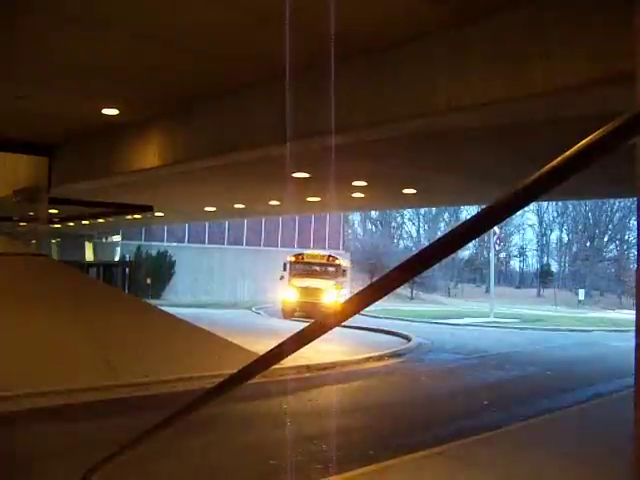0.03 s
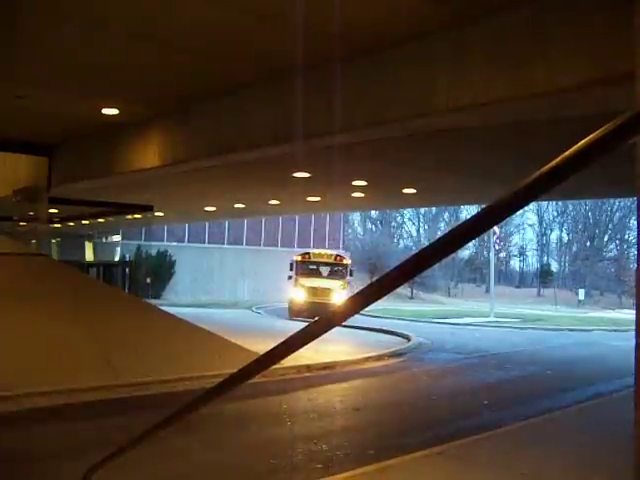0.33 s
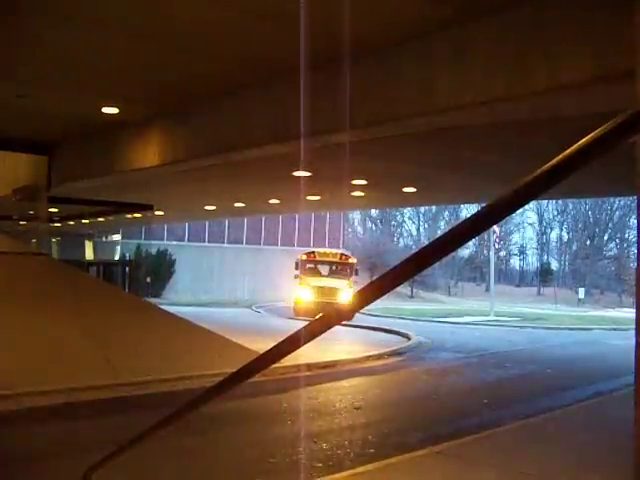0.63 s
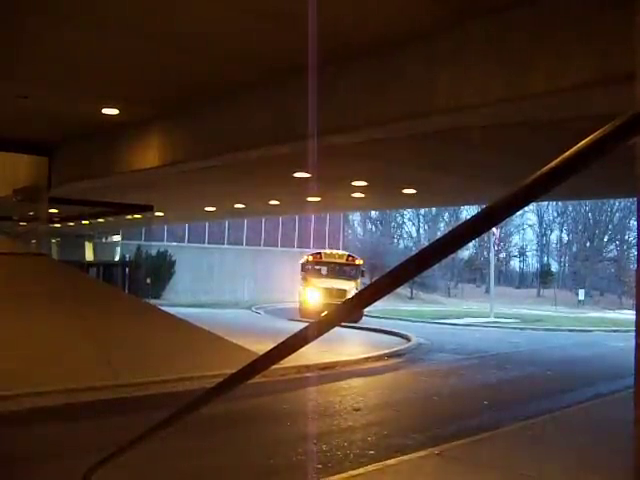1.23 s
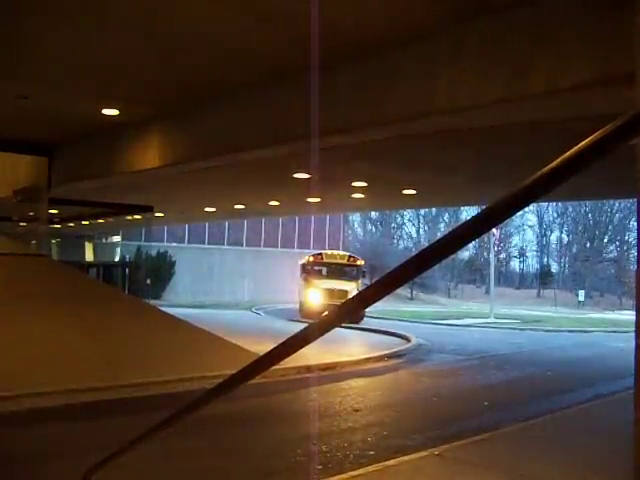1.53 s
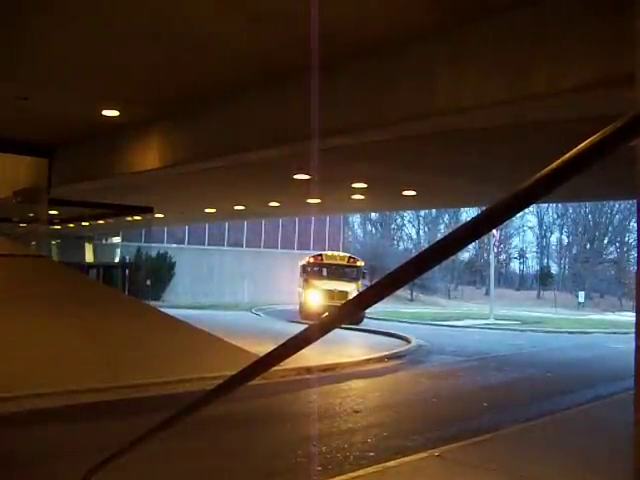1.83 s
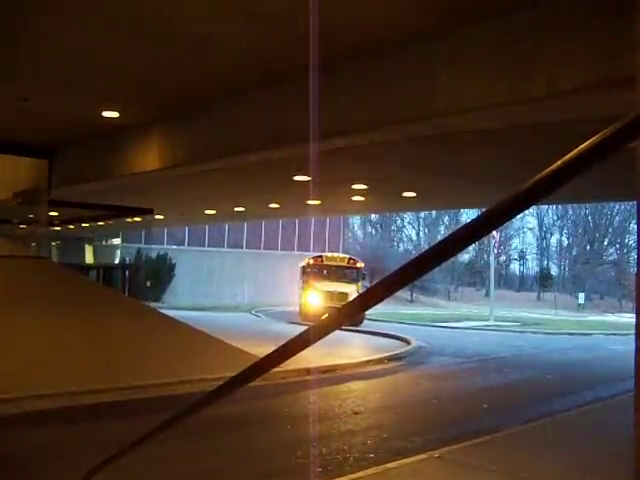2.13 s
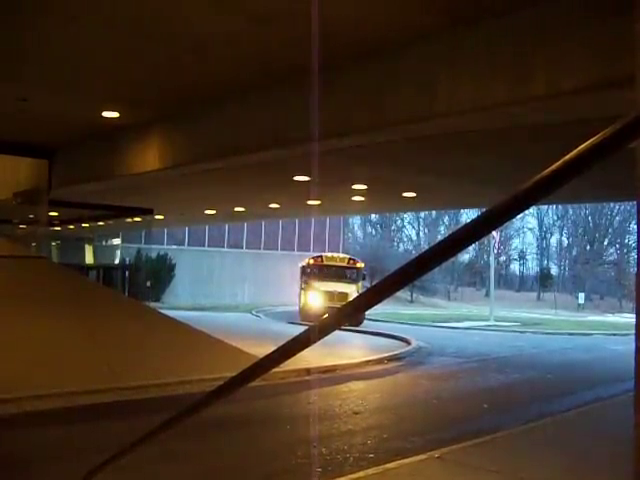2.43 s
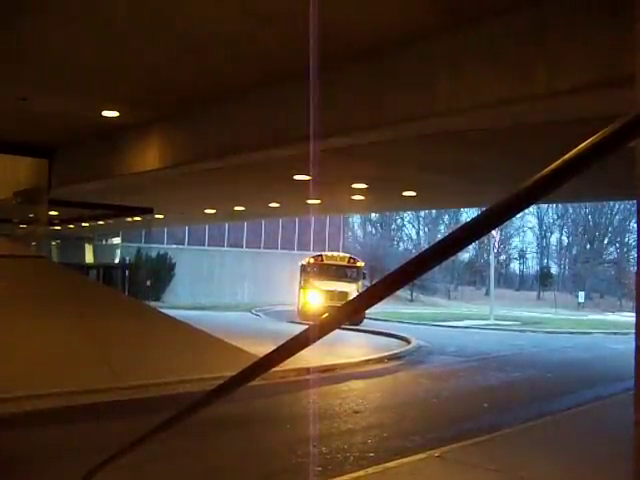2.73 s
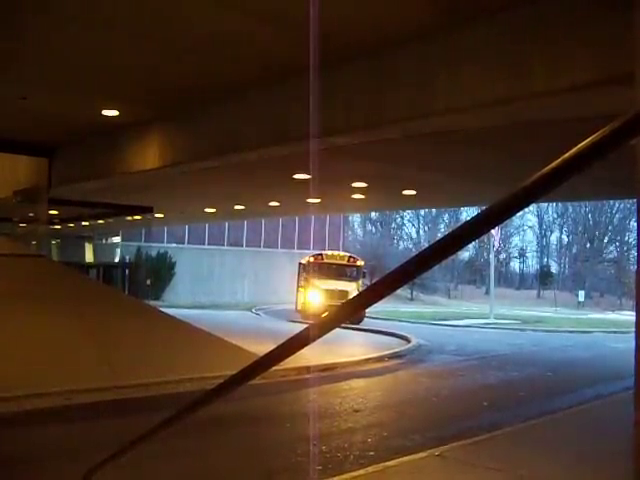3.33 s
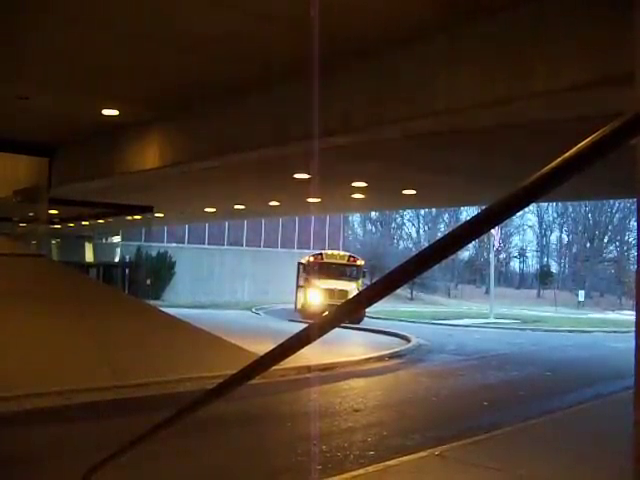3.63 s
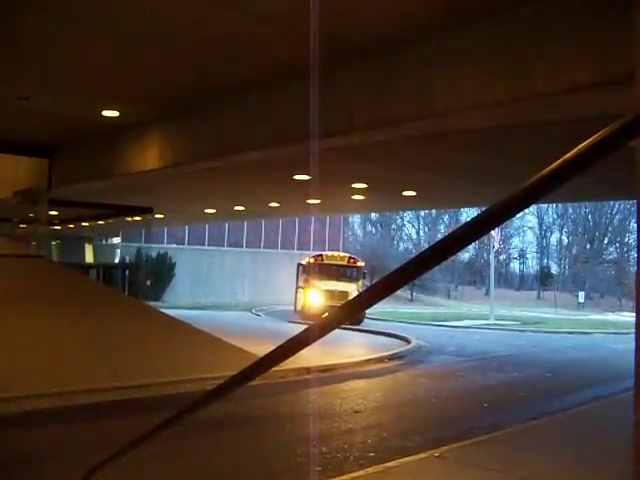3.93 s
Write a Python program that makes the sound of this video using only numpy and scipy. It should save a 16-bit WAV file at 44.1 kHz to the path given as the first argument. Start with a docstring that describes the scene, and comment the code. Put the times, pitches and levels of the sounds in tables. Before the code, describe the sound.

A diesel bus engine throbs and clatters under a concrete overpass. Its brakes chirp, then squeal on one echoing note, with a short dry click midway. Once the bus stops, air hisses out and fades over the idle.

```python
"""A diesel bus creeps to a stop under a concrete overpass, its engine throbbing, booming and
clattering from start to end. First the brakes catch in short, high chirps. After about a second they
squeal on one strong note that echoes off the concrete.
Halfway through the squeal, the recorder gives one short, dry click.
Once the bus stands, the brake valve lets out a hiss of air that slowly fades over the idling engine."""
import sys
import numpy as np
from scipy import signal
from scipy.fft import rfft, irfft, next_fast_len
from scipy.io import wavfile
from scipy.ndimage import map_coordinates

SR = 44100
rng = np.random.default_rng(int(sys.argv[2]) if len(sys.argv) > 2 else 0)


def unload_wav(signal):
    """Save mono or channel-first audio to the path in sys.argv[1] as 16-bit WAV at rate SR, clipped to [-1, 1]."""
    wavfile.write(
        sys.argv[1],
        SR,
        np.round(np.clip(np.atleast_2d(signal).T, -1, 1) * 32767).astype(np.int16),
    )


N = 176400  # 4 seconds


def amp(db):
    """Turn decibels into a number to multiply a sound by."""
    return 10 ** (np.asarray(db) / 20)


def unit(x):
    """Scale a sound to an average strength (rms) of 1."""
    return x / np.sqrt(np.mean(x ** 2) + 1e-20)


def clock():
    """The time of each sample, in seconds."""
    return np.arange(N) / SR


def along(points, hz):
    """Read between (pitch_hz, value) points, giving each octave equal room."""
    pitches, values = np.transpose(points)
    return np.interp(np.log(hz + 1), np.log(pitches + 1), values)


def curves(rows):
    """Join rows of (time_s, values...) with straight lines: one curve per value column."""
    times, *columns = np.transpose(rows)
    return [np.interp(clock(), times, column) for column in columns]


def wobble(rate):
    """A smooth curve through `rate` random values a second."""
    t = clock()[::64]
    values = rng.standard_normal(int(N * rate / SR) + 4)
    return np.interp(clock(), t, map_coordinates(values, [t * rate]))


def filtered(x, response):
    """Turn each frequency of a sound up or down by response(hz)."""
    size = next_fast_len(N + SR // 2)
    return irfft(rfft(x, size) * response(np.fft.rfftfreq(size, 1 / SR)), size)[:N]


def rush(colour):
    """Rushing noise; its colour says how strong each pitch is compared with the others."""
    return unit(filtered(rng.standard_normal(N), lambda hz: amp(along(colour, hz))))


def tone(hz, rough, rate):
    """A note that follows a pitch curve; `rough` is how much it flutters, `rate` how fast."""
    flutter = 1 + rough * (wobble(rate) + 1j * wobble(rate))
    cycles = np.cumsum(hz) / SR + rng.random()
    return unit(np.real(flutter * np.exp(2j * np.pi * cycles)))


def gate(start, end, attack, release):
    """A volume shape: rise smoothly from start, hold until end, then die away (all in seconds)."""
    t = clock()
    rise = np.sin(np.pi / 2 * np.clip((t - start) / attack, 0, 1)) ** 2
    return rise * np.exp(-np.maximum(t - end, 0) / release)


def brake_squeal():
    """The rubbing brake rings on one note, at two and three times its pitch, and on a separate high note."""
    # the main note's pitch: time_s, pitch_hz
    pitches = [(1.05, 2645), (1.11, 2630), (1.145, 2601), (1.19, 2590), (1.3, 2585), (1.45, 2586),
               (1.6, 2591), (1.78, 2596), (2.2, 2594)]
    # how the main note swells and dips: time_s, relative_db
    levels = [(1.06, -47), (1.112, -30.5), (1.14, -33), (1.2, -23.5), (1.31, -20.5), (1.545, -23),
              (1.565, -30), (1.61, -30), (1.635, -39), (1.66, -28.5), (1.712, -33), (1.785, -28.5),
              (1.836, -38), (1.868, -37), (1.89, -52), (1.925, -35), (1.965, -29.5), (1.993, -48),
              (2.02, -41), (2.1, -44)]
    # the three higher notes, as relative levels: time_s, second_db, third_db, upper_db
    overtones = [(1.105, -56, -55, -58), (1.135, -46, -38, -43), (1.18, -44, -30, -36),
                 (1.235, -41, -27.5, -35), (1.305, -39.5, -34, -41), (1.335, -39.5, -42, -50),
                 (1.385, -42, -32, -40), (1.5, -48, -39, -47), (1.55, -43, -38, -45), (1.58, -42, -52, -58),
                 (1.625, -39.5, -42, -50), (1.655, -43, -52, -58), (1.84, -58, -60, -66)]
    (hz,), (note_db,) = curves(pitches), curves(levels)
    second_db, third_db, upper_db = curves(overtones)
    pad_grip = amp(1.1 * wobble(55))  # the pad's grip flutters
    engine_shake = 1 + .07 * tone(np.full(N, 108), rough=.6, rate=25)
    note = amp(note_db + .3) * tone(hz, rough=.11, rate=85)
    note *= gate(levels[0][0], levels[-1][0], attack=.03, release=.035)
    top_start_s, top_end_s = overtones[0][0], overtones[-1][0]
    upper_hz = 8243 - 70 * np.exp(-np.maximum(clock() - top_start_s, 0) / .025)  # slides up into place
    high_notes = [(2 * hz, second_db), (3 * hz, third_db), (upper_hz, upper_db)]
    top = sum(amp(db + 2) * tone(pitch, rough=.15, rate=70) for pitch, db in high_notes)
    top *= gate(top_start_s, top_end_s, attack=.02, release=.04)
    return pad_grip * engine_shake * (note + top)


def brake_chirps():
    """The brakes catch and ring briefly; some chirps start a little high and slide down."""
    # one chirp a row: start_s, length_s, rise_s, fade_s, pitch_hz, starts_above_hz, level_db, roughness
    chirps = [(.03, .09, .03, .07, 7310, 40, -43, .6), (.28, .09, .06, .035, 7218, 20, -36, .4),
              (.31, .21, .03, .05, 6088, 25, -42, .2), (.34, .1, .03, .025, 3220, 0, -55, .9),
              (.47, .032, .025, .012, 7015, 0, -29.5, .15), (.52, .2, .015, .025, 7008, 0, -31, .38),
              (.566, .018, .016, .008, 6972, 0, -24.5, .15), (.75, .06, .015, .08, 7008, 0, -42, .55),
              (.58, .06, .02, .04, 7645, 0, -46, .6), (.47, .2, .02, .08, 8990, 0, -66, .5),
              (.46, .06, .03, .025, 2940, 0, -44.5, .35), (.87, .125, .08, .02, 2842, 45, -30.5, .15),
              (1.03, .12, .02, .05, 2838, 0, -40, .55), (1.09, .09, .03, .06, 2635, 0, -35, .45)]
    settle_s = .04
    out = np.zeros(N)
    for start, length, rise, fade, hz, above_hz, db, rough in chirps:
        pitch = hz + above_hz * np.exp(-np.maximum(clock() - start, 0) / settle_s)
        out += amp(db) * tone(pitch, rough, rate=65) * gate(start, start + length, rise, fade)
    return out


def air_release():
    """The brake valve cracks open, then opens fully; the escaping air hisses, roars and dies away."""
    # three parts of the escaping air, each: start_s, rise_s, hold_until_s, fade_db_per_s, level_db
    leak = (2.333, .025, 2.82, 16, -35.7)
    jet = (2.405, .035, 2.68, 38, -27.4)
    roar = (2.35, .28, 2.76, 18.5, -27.1)
    # the colours of the high hiss and the lower roar: pitch_hz, relative_db
    hiss_colour = [(1500, -40), (2600, -16), (3400, -19.5), (3850, -24), (4200, -29.5), (4600, -20.5),
                   (5100, -11.2), (5600, -9.5), (6500, -4), (6850, -4.5), (7250, 1), (7650, 2), (7900, -2),
                   (8350, -8), (8750, -24), (9000, -42)]
    roar_colour = [(100, -32), (170, -5), (240, 2), (340, -7), (420, -9), (470, 3), (520, -8), (700, -11),
                   (1000, -14), (1450, -5), (1700, 0), (1880, 5.5), (2050, 0), (2300, -3.5), (2700, -10.5),
                   (3400, -20), (4200, -42), (6000, -60)]
    out = np.zeros(N)
    for part, colour in [(leak, hiss_colour), (jet, hiss_colour), (roar, roar_colour)]:
        start, rise, end, fade_db_per_s, db = part
        fade_s = 20 / np.log(10) / fade_db_per_s
        out += amp(db + .5 * wobble(25)) * gate(start, end, rise, fade_s) * rush(colour)
    return out


def engine():
    """The idling diesel throbs, booms in the passage and clatters in pulses, one for each firing."""
    # how fast the cylinders fire: time_s, firings_per_s
    firing = [(0, 47.5), (1, 46.2), (2, 47), (4, 47.8)]
    # the low tones of the throb: multiple_of_firing_rate, level_db
    throb_tones = [(.43, -42.5), (1, -41), (2.28, -45), (4.69, -51), (7.05, -52.5), (9.08, -52.5)]
    # how four noises swell and dip, from the deep boom up to the high fizz: time_s, relative_db
    boom_levels = [(0, -36), (.3, -36.5), (.34, -27.5), (.385, -28), (.43, -36), (.62, -39), (.68, -32),
                   (.82, -36), (.95, -32), (1.15, -32.5), (1.3, -35.5), (2.1, -36), (2.32, -33.5),
                   (2.45, -38), (3.05, -37), (3.65, -42), (3.72, -32), (4, -35.5)]
    body_levels = [(0, -34), (.7, -35), (1.4, -37.3), (1.9, -35.2), (2.3, -35.8), (2.7, -34.5), (3.55, -38),
                   (3.8, -34.3), (4, -35)]
    clatter_levels = [(0, -30.8), (.8, -31), (1.5, -30.8), (2.2, -31), (2.55, -34.5), (3.1, -33),
                      (3.68, -33.2), (3.77, -29.8), (4, -31)]
    fizz_levels = [(0, -45.5), (.35, -43.3), (.7, -43.3), (1, -46.5), (1.25, -42.5), (1.7, -45.5),
                   (2.2, -47), (3.6, -51), (3.85, -45.5), (4, -48)]
    # the colours of the same four noises: pitch_hz, relative_db
    boom_colour = [(30, -30), (58, -20), (68, -9), (77, -2), (88, -5), (107, 1), (122, -7), (137, -5),
                   (152, -17), (220, -40), (400, -80)]
    body_colour = [(20, -4), (35, -14), (130, -5), (180, -.5), (225, 0), (300, -1.5), (400, -2.5),
                   (490, -7), (600, -9), (680, -6), (850, -10), (1100, -14), (2000, -30), (4000, -75)]
    clatter_colour = [(400, -30), (850, -11), (980, -5), (1075, .5), (1180, -3.5), (1270, -2), (1325, 0),
                      (1400, -.5), (1620, -1.5), (1820, .5), (2000, 1), (2170, -4), (2450, -11.5),
                      (2900, -16.5), (3400, -28), (4200, -37), (5000, -52), (8000, -80)]
    fizz_colour = [(3000, -60), (4300, -24), (4700, -17), (5100, -9), (5450, -10), (5900, -7), (6700, -4.5),
                   (7300, 0), (7650, 1), (7900, -3), (8300, -7), (8650, -22), (9000, -44)]
    # the notes at which the engine block rings: pitch_hz, width_hz, relative_db
    block_rings = [(660, 25, -23), (965, 30, -20), (1100, 35, -14), (1320, 22, -14), (1362, 25, -17),
                   (1430, 20, -19), (1800, 30, -17), (1890, 35, -15), (1985, 35, -15), (2110, 25, -21)]
    firing_hz = curves(firing)[0]
    throb = sum(amp(db) * tone(k * firing_hz, rough=.25 * np.sqrt(k), rate=7) for k, db in throb_tones)
    knock = unit(1 + .11 * tone(firing_hz, rough=.6, rate=20) / np.sqrt(2))
    boom = amp(curves(boom_levels)[0] - .2) * rush(boom_colour)
    body = amp(curves(body_levels)[0] + .4 * wobble(4)) * rush(body_colour)
    rings = sum(amp(db) * tone(np.full(N, hz), rough=2, rate=width) for hz, width, db in block_rings)
    clatter = amp(curves(clatter_levels)[0]) * unit(rush(clatter_colour) + amp(-1.5) * rings)
    fizz = amp(curves(fizz_levels)[0] + .8 * wobble(22)) * rush(fizz_colour)
    return throb + boom + body + knock * (clatter + fizz)


def overpass_echo(x):
    """Sound bounces between the concrete deck and walls; high pitches die away sooner."""
    # how long the echo takes to fall by 60 dB: pitch_hz, time_s
    echo_times = [(200, 1.4), (2500, 1.1), (8000, .7)]
    hz, t, noise = signal.stft(rng.standard_normal(SR), SR, nperseg=256)
    fade = amp(-60 * t / along(echo_times, hz)[:, None])
    tail = signal.istft(noise * fade, SR, nperseg=256)[1]
    delayed = np.pad(x, (int(.02 * SR), 0))
    return signal.fftconvolve(delayed, tail / np.linalg.norm(tail))[:N]


def recorder_click():
    """A glitch in the recorder gives one short, dry click: a note that dies almost at once."""
    start_s, pitch_hz, rise_s, fade_s = 1.544, 2850, .00008, .00025
    t = np.maximum(clock() - start_s, 0)
    shape = np.exp(-t / fade_s) * (1 - np.exp(-t / rise_s))
    return amp(-7) * np.sin(2 * np.pi * pitch_hz * t) * shape


def scene():
    """Add all the sounds into one channel; only the squeal and chirps get an echo."""
    brakes = brake_squeal() + brake_chirps()
    bus = engine() + brakes + amp(-16) * overpass_echo(brakes) + air_release()
    return (bus + recorder_click())[None]


def record(dry):
    """The microphone softens one narrow band of pitches and loses the very highest ones."""
    dip_hz, dip_width_hz, dip_db, top_hz = 4200, 170, -6, 9100
    dip = lambda hz: amp(dip_db * np.exp(-((hz - dip_hz) / dip_width_hz) ** 2))
    limit = lambda hz: np.clip((top_hz - hz) / 100, 0, 1)
    return filtered(dry[0], lambda hz: dip(hz) * limit(hz))[None]


dry = scene()
out = record(dry)
unload_wav(out)
```